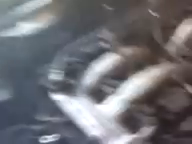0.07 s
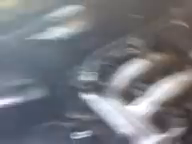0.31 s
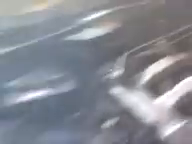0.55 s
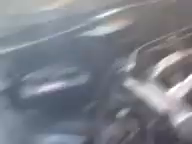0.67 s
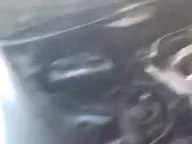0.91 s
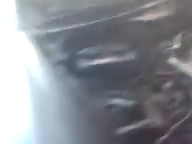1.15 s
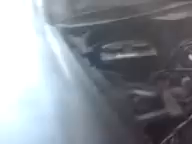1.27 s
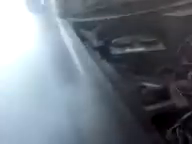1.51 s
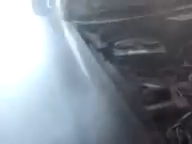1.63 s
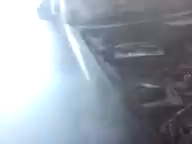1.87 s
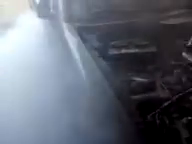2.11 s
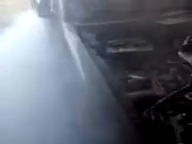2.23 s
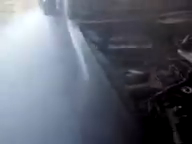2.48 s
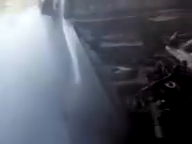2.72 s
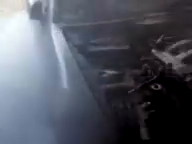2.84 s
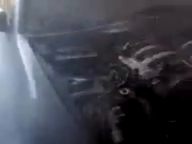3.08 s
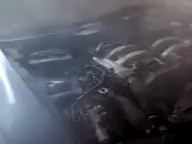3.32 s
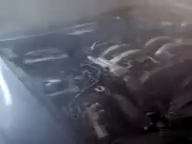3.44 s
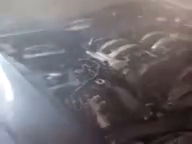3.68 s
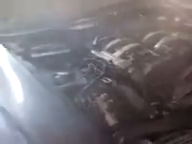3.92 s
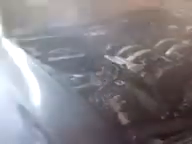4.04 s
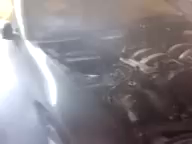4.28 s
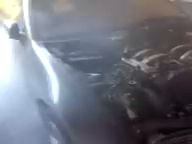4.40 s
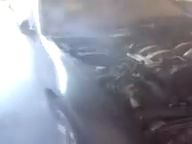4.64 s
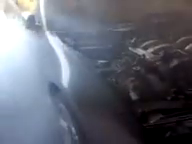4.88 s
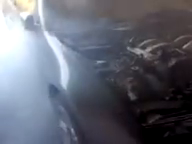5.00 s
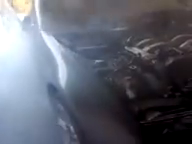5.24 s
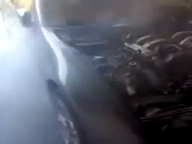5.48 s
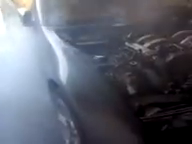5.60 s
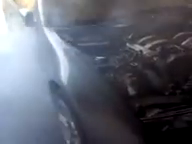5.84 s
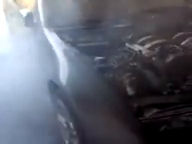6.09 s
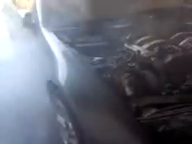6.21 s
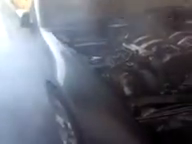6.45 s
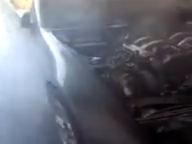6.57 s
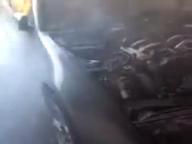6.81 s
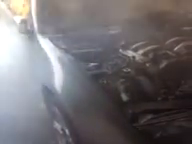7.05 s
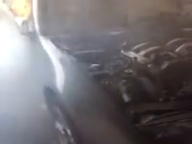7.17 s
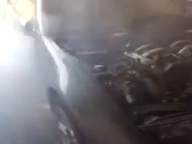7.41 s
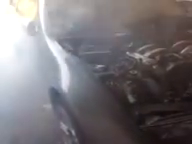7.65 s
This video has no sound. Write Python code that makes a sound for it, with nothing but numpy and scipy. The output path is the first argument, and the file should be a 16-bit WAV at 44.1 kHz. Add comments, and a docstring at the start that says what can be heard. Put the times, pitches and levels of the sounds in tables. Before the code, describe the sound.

A six-cylinder car engine is caught at the top of a short, booming rev that clips harshly. Within a second its pitch and loudness fall, the firings stumble, and it settles to a low, slightly hunting idle. Metallic rattle, cover clatter and fine valve ticks continue over a low rumble. The narrow-band microphone is close, moving from the manifold across the engine bay to the wing.

```python
"""A short rev is heard first, then a V6 car engine drops to a steady, slightly hunting idle under an open bonnet.
Six unequal firings a cycle ring the manifold as a drone, with sustained engine orders and an intake gulp.
Block rattle, cover clatter and valve ticks are noise impacts in step with the cam; metal panels ring and a belt
swishes over a low rumble. The narrow-band microphone, close in, moves from near the manifold over the bay
towards the wing, and loud peaks clip."""
import sys
import numpy as np
from scipy.fft import rfft, irfft, next_fast_len
from scipy.io import wavfile
from scipy.ndimage import uniform_filter1d, map_coordinates

SR = 44100
rng = np.random.default_rng(int(sys.argv[2]) if len(sys.argv) > 2 else 0)


def digitize_waveform(pressure):
    """Quantize a signal to 16-bit integers and store it at the path in sys.argv[1].

    Rows of a 2-D input are taken as channels; values are limited to [-1, 1].
    """
    field = np.atleast_2d(pressure).T
    bounded = np.clip(field, -1, 1)
    quanta = np.round(bounded * 32767).astype(np.int16)
    wavfile.write(sys.argv[1], SR, quanta)


N = 339570

# Engine speed; one cycle is two crank turns and six firings: (time [s], speed [cycles/s])
ENGINE_SPEED = [(0, 15.069), (0.2, 16.508), (0.41, 15.81), (0.53, 13.436), (0.72, 11.069), (1, 9.257),
                (1.35, 7.969), (1.65, 7.5), (1.98, 7.445), (2.65, 7.883), (3.35, 8.114), (4.3, 7.963),
                (5.5, 7.785), (5.95, 7.784), (6.4, 7.721), (7.7, 7.605)]
# Microphone position, 0 at the manifold, 1 over the bay, 2 by the wing: (time [s], position [0-2])
MIC_POSITION = [(1.02, 0.28), (1.6, 1.23), (3.9, 1.03), (4.8, 1.85), (6.3, 1.88)]
# Sustained tones, keyed by order [vibrations/cycle]: (open throttle [dB],
# shut throttle at the manifold [dB], over the bay [dB], by the wing [dB])
ENGINE_ORDERS = {15: (-18, -42.5, -50.5, -51.5), 18: (-15.5, -42, -45, -34.5), 21: (-35.5, -33, -46, -43),
                 30: (-35.5, -30.5, -29.5, -39), 36: (-23, -33, -27.5, -28.5), 49: (-37, -39, -30.5, -29.5)}
# Firings in order: (place in cycle [0-1], at the manifold [dB], over the bay [dB], by the wing [dB])
CYLINDER_FIRINGS = [(0, -3, -4.5, 4), (0.176, -15.5, -6, -20), (0.334, -0.5, -6, 3.5),
                    (0.51, -7, -9, -13.5), (0.666, 0, -10.5, -2), (0.837, -5.5, -13.5, 0)]
# Level swings over one cycle: (place in cycle [0-1], block rattle [dB], clatter [dB], valves [dB])
CAM_SWING = [(0, 1.5, 2.5, 3), (.1, -4, 3.5, -2.5), (0.201, 2, -1.5, 3), (0.302, -10, 4, 3.5),
             (0.418, 0.5, 1.5, 0.5), (0.578, -8, 1.5, -1.5), (.72, -3.5, 3.5, 1), (.85, -2, 4, 1.5)]
# Firing resonance heard at each position, relative level: (frequency [Hz], level [dB])
MANIFOLD_RESONANCE = [(100, -26), (175, -32), (205, -15.5), (245, -1), (285, -0.5), (325, 5.5),
                      (375, -12.5), (470, -14), (700, -42)]
BAY_RESONANCE = [(100, -50), (165, -27), (195, 9), (240, 5), (288, 9.5), (325, -13.5), (400, -10.5),
                 (470, -33.5), (700, -58)]
WING_RESONANCE = [(100, -57.5), (175, -19.5), (208, 6.5), (232, 3), (283, 3), (325, -11), (390, -10.5),
                  (480, -34.5), (700, -57.5)]
# Spectra of the rattling block, covers, valves and low rumble, relative level: (frequency [Hz], level [dB])
BLOCK_SPECTRUM = [(100, -27.5), (220, 0), (330, 1.5), (400, 3.5), (480, -2), (550, -6), (670, -4.5),
                  (760, -17), (1000, -22.5), (2000, -56)]
COVER_SPECTRUM = [(400, -28), (780, -0.5), (900, 3), (1020, 1), (1120, 6), (1180, -1.5), (1300, 4),
                  (1600, -1), (1900, -6.5), (2400, -17.5), (4000, -63)]
VALVE_SPECTRUM = [(1000, -14), (1900, 2), (2270, 6), (2850, -2), (3150, 0.5), (3450, -4), (3700, -14.5),
                  (4100, -24.5), (4400, -38), (4700, -102.5)]
RUMBLE_SPECTRUM = [(20, -27), (40, -14.5), (65, 6.5), (110, 5.5), (200, 10.5), (400, -7.5), (900, -22.5),
                   (4000, -81)]
# Belt swish before its swings, fading as the idle settles: (time [s], level [dB])
BELT_SWISH = [(1.1, -40), (2.3, -36), (2.9, -43), (4.3, -45), (7.7, -56)]
# Loudness, keyed by part: (idle level at the manifold [dB], over the bay [dB], by the wing [dB],
# rise [dB per doubling of speed])
PART_LOUDNESS = { "drone": (-14.5, -20, -23, 6.5), "intake": (-29, -30, -28.5, 8.5),
                 "block": (-19.5, -23, -23, 12), "clatter": (-29, -32.5, -31.5, 12.5),
                 "valves": (-37, -37, -39.5, 13), "zing": (-46.5, -48, -48.5, 6),
                 "ring": (-45.5, -37, -43, 5), }

FIRING_S = 4.052  # a moment when the first cylinder is at the start of its cycle
IDLE_RATE = 7.8  # cycles per second
SHUT_S, CLOSE_S = .46, .12  # the throttle starts to shut, and the seconds it takes
# unevenness of the firings: added after the throttle shuts, always there, seconds to settle
OVERRUN_STUMBLE, IDLE_STUMBLE, SETTLE_S = 0.96, 0.061, 0.88
# surge after the throttle shuts: decay in seconds, dB on the drone, dB on the valves
SURGE_S, SURGE_DRONE_DB, SURGE_VALVES_DB = 0.2, 4, 7
WAVER_RAD, WAVER_RATE = 0.2, 6  # phase wander of each order: scale in radians, knots a second
WING_LEAD = .045  # share of a cycle by which the drone and gulp come earlier by the wing
MIC_HZ, TOP_HZ = 4300, 15830  # top of the microphone band, and of the final sound
CLIP_LEVEL = .715  # of full scale


def amp(db):
    """Decibels to gain."""
    return 10 ** (np.asarray(db) / 20)


def unit(x):
    """x at rms 1."""
    return x / np.sqrt(np.mean(x ** 2) + 1e-20)


def steady(x):
    """x levelled to about rms 1 by its power smoothed over half and quarter seconds."""
    power = uniform_filter1d(uniform_filter1d(x * x, SR // 2), SR // 4)
    return x / np.sqrt(np.abs(power) + 1e-20)


def curves(rows):
    """One value per sample for each column after the time."""
    s, *columns = np.transpose(rows)
    return [np.interp(np.arange(N) / SR, s, column) for column in columns]


def noise():
    """White noise."""
    return rng.standard_normal(N)


def wobble(rate):
    """A smooth random curve, rate knots a second."""
    knots = rng.standard_normal(int(N * rate / SR) + 4)
    return map_coordinates(knots, [np.arange(N) * rate / SR])


def filtered(x, response):
    """x times a response of frequency."""
    m = next_fast_len(N + SR // 2)
    return irfft(rfft(x, m) * response(np.fft.rfftfreq(m, 1 / SR)), m)[:N]


def coloured(x, points):
    """x through a (Hz, dB) spectrum on a log axis."""
    hz, db = np.transpose(points)
    return filtered(x, lambda f: amp(np.interp(np.log(f + 1), np.log(hz), db)))


def cycles():
    """Shaft angle in engine cycles: the running sum of speed, zero at FIRING_S."""
    turned = np.cumsum(curves(ENGINE_SPEED)[0]) / SR
    return turned - turned[round(FIRING_S * SR)]


def octaves():
    """Doublings of the engine speed above idle."""
    return np.log2(curves(ENGINE_SPEED)[0] / IDLE_RATE)


def throttle():
    """1 while the throttle is open, 0 once it is shut."""
    return np.clip(1 - (np.arange(N) / SR - SHUT_S) / CLOSE_S, 0, 1)


def overrun(fade_s):
    """Rises to 1 as the throttle shuts, then dies away."""
    since = np.maximum(np.arange(N) / SR - SHUT_S - CLOSE_S, 0)
    return (1 - throttle()) * np.exp(-since / fade_s)


def stumble():
    """The firings turn uneven as the throttle shuts, then settle."""
    return IDLE_STUMBLE + OVERRUN_STUMBLE * overrun(SETTLE_S)


def by_place(values):
    """Glides between one value for each position as the microphone moves."""
    return np.interp(curves(MIC_POSITION)[0], np.arange(len(values)), values)


def nearness(k):
    """1 with the microphone at position k, falling to 0 at the next."""
    return np.maximum(1 - np.abs(curves(MIC_POSITION)[0] - k), 0)


def level(part):
    """A part's dB: set by where the microphone is, and rising with engine speed."""
    *place_db, rise_db = PART_LOUDNESS[part]
    return by_place(place_db) + rise_db * octaves()


def low_rumble():
    """Random low-frequency noise, steady under everything."""
    return amp(-37.5) * unit(coloured(noise(), RUMBLE_SPECTRUM))


def panel(hz, width_hz):
    """A metal or belt resonance shaken at random: noise through a squared bandpass, rms 1."""
    def response(f):
        damping = 1j * f * width_hz
        return (damping / (hz * hz - f * f + damping)) ** 2
    return unit(filtered(noise(), response))


def sheet_metal_ring():
    """Sheet metal rings in a narrow band with a wavering level."""
    return amp(level("ring") + 3.4 * wobble(15)) * panel(1222, width_hz=77)


def belt_swish(clatter_swing):
    """The belt swishes as a band of noise that swings with the cycle."""
    swish_db = curves(BELT_SWISH)[0] + clatter_swing + 0.49 * wobble(49)
    return amp(swish_db) * panel(1516, width_hz=360)


def valve_zing(valve_swing):
    """Thin metal rings along with the valves."""
    return amp(level("zing") + valve_swing + 2.5 * wobble(22)) * panel(3218, width_hz=230)


def machinery(angle, swing_db, spectrum, repeat, size=4096):
    """Small impacts that recur at the same angles each cycle, mixed with loose ones, ring a fixed body."""
    locked = np.zeros(N)
    for k in range(3):  # one repeating pattern for each microphone position
        random_phases = np.exp(2j * np.pi * rng.random(size // 2 + 1))
        pattern = unit(irfft(random_phases))
        turning = np.interp(angle, np.arange(size) / size, pattern, period=1)
        locked += np.sqrt(nearness(k)) * turning
    impacts = np.sqrt(repeat) * locked + np.sqrt(1 - repeat) * noise()
    return steady(coloured(impacts * amp(swing_db), spectrum))


def tappets(angle, depth_db, count=12):
    """Bumps in dB as twelve valves seat each cycle, each of random force, fading over one gap."""
    seat = np.floor(angle * count).astype(int)
    force = rng.exponential(1, seat.max() - seat.min() + 1)[seat - seat.min()]
    return depth_db * np.sqrt(force) * np.exp(-(angle * count % 1))


def valve_ticks(angle, valve_swing):
    """Valves tick as they seat; stumbling firings shake their gear into rough bursts."""
    shake_db = (1.1 + 1.6 * stumble()) * wobble(35) + SURGE_VALVES_DB * overrun(SURGE_S)
    swing_db = valve_swing + tappets(angle, depth_db=3.0) + shake_db
    return amp(level("valves")) * machinery(angle, swing_db, VALVE_SPECTRUM, repeat=0.1)


def cover_clatter(angle, clatter_swing):
    """The covers clatter under the valve seatings, with a random flutter in level."""
    swing_db = clatter_swing + tappets(angle, depth_db=5.0) + 2.1 * wobble(25)
    return amp(level("clatter")) * machinery(angle, swing_db, COVER_SPECTRUM, repeat=.42)


def block_rattle(angle, block_swing):
    """The block rattles with impacts that swing in step with the cam."""
    return amp(level("block")) * machinery(angle, block_swing, BLOCK_SPECTRUM, repeat=0.6)


def intake_gulp(angle, centre, length, pitch_hz, rise_hz):
    """Once a cycle the intake gives a short rising 'wub'; centre and length are shares of the cycle."""
    offset = (angle - centre + .5) % 1 - .5
    t = offset / curves(ENGINE_SPEED)[0]
    swell = np.exp(-.5 * (offset / length) ** 2)
    wub = np.sin(2 * np.pi * t * (pitch_hz + .5 * rise_hz * offset / length))
    return amp(level("intake")) * unit(swell * wub)


def order_hum(angle):
    """Wavering engine orders fill the gaps between firings; the open throttle makes the low ones boom."""
    stagger = 24  # sets each order's starting phase so it does not cancel the drone's own line at that order
    opening, tones = throttle(), np.zeros(N)
    for order, (open_db, *shut_db) in ENGINE_ORDERS.items():
        db = opening * open_db + (1 - opening) * by_place(shut_db)
        phase = 2 * np.pi * (order * angle + order ** 2 / stagger)
        tones += amp(db) * unit(np.sin(phase + WAVER_RAD * wobble(WAVER_RATE)))
    return tones


def firings(angle, scatter_db, jitter_s, echo_s, echo, lag_s):
    """One pulse a firing rings the manifold and returns from the bonnet; each position has its own balance."""
    table = np.array(CYLINDER_FIRINGS)
    due = np.arange(np.floor(angle[0]), angle[-1])[:, None] + table[:, 0]
    at = np.interp(due, angle, np.arange(N), left=-SR, right=2 * N)  # in samples
    uneven = np.interp(at, np.arange(N), stumble())
    # half the echo delay early, so pulse and reflection straddle the firing
    at = at + SR * (uneven * jitter_s * rng.standard_normal(due.shape) - echo_s / 2)
    strength = amp(uneven * scatter_db * rng.standard_normal(due.shape))
    heard = (at >= 0) & (at < N)
    drone = np.zeros(N)
    for k, resonance in enumerate([MANIFOLD_RESONANCE, BAY_RESONANCE, WING_RESONANCE]):
        weights = strength * amp(table[:, k + 1])
        pulses = np.bincount(at[heard].astype(int), weights[heard], N)
        drone += nearness(k) * unit(coloured(pulses, resonance))
    # higher tones travel faster through the metal, so each thump slides down in pitch
    main_hz = 240
    drone = filtered(drone, lambda hz: np.exp(1j * np.pi * lag_s * (hz - main_hz) ** 2 / main_hz))
    # the bonnet's reflection counts only away from the manifold
    reflection = filtered(drone, lambda hz: np.exp(-2j * np.pi * hz * echo_s))
    return steady(drone + echo * by_place([0, 1, 1]) * reflection)


def firing_drone(angle):
    """The firings run together as a drone, with a brief surge as the throttle shuts."""
    thumps = firings(angle, scatter_db=4.0, jitter_s=0.00051, echo_s=0.00853, echo=0.89, lag_s=.02)
    return amp(level("drone") + SURGE_DRONE_DB * overrun(SURGE_S)) * thumps


def scene():
    """Drone, gulp, rattle, clatter, valves and hum follow the one shaft, over a low rumble."""
    angle = cycles()
    early = angle + by_place([0, 0, WING_LEAD])
    spot, *swings = np.transpose(CAM_SWING)
    block_swing, clatter_swing, valve_swing = [np.interp(angle, spot, s, period=1) for s in swings]
    mix = low_rumble() + sheet_metal_ring()
    mix += belt_swish(clatter_swing) + valve_zing(valve_swing)
    mix += valve_ticks(angle, valve_swing)
    mix += cover_clatter(angle, clatter_swing)
    mix += block_rattle(angle, block_swing)
    mix += intake_gulp(early, centre=0.0489, length=.095, pitch_hz=413.2, rise_hz=65)
    mix += order_hum(angle)
    mix += firing_drone(early)
    return mix[None]


def record(dry):
    """The narrow microphone band comes first; loud peaks then clip flat and spray treble."""
    narrow = filtered(dry[0], lambda hz: 1 / (1 + (hz / MIC_HZ) ** 60))
    clipped = np.clip(narrow, -CLIP_LEVEL, CLIP_LEVEL)
    return filtered(clipped, lambda hz: hz < TOP_HZ)[None]


dry = scene()
out = record(dry)
digitize_waveform(out)
```